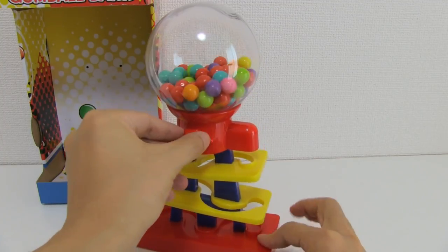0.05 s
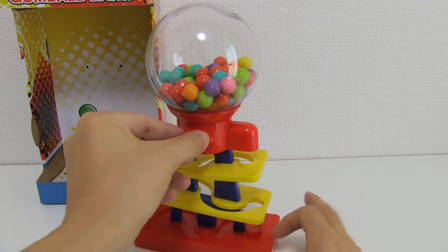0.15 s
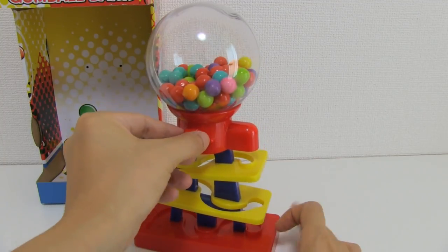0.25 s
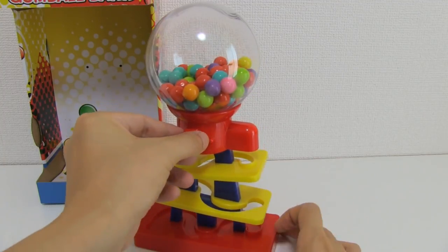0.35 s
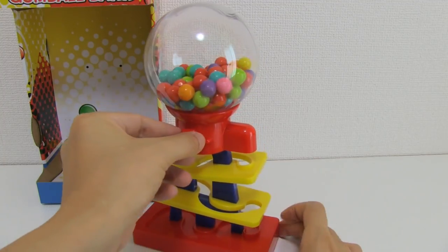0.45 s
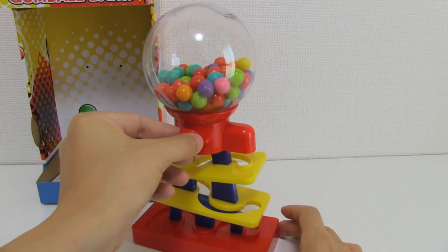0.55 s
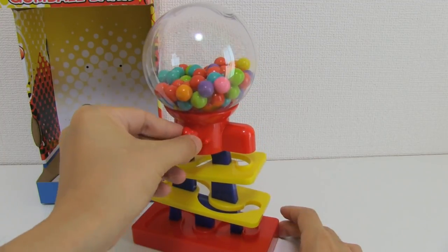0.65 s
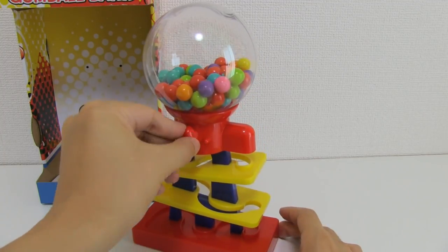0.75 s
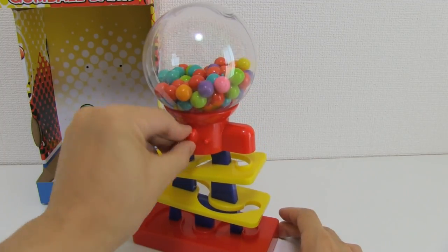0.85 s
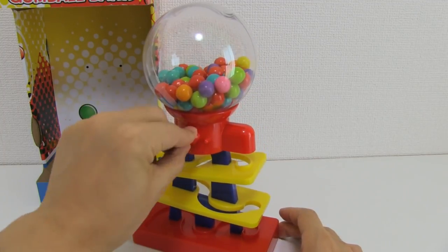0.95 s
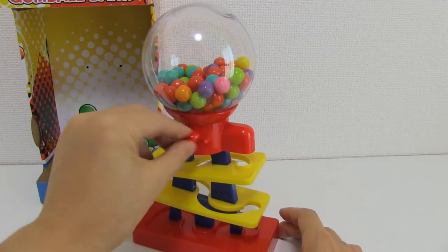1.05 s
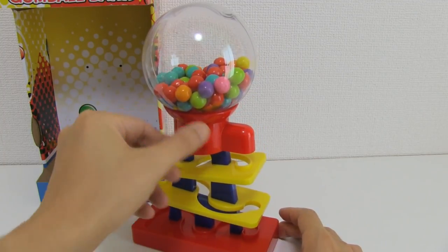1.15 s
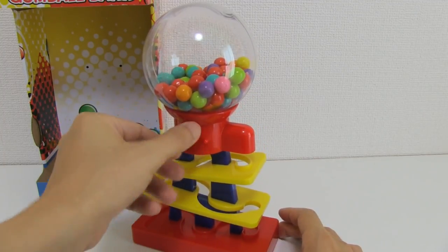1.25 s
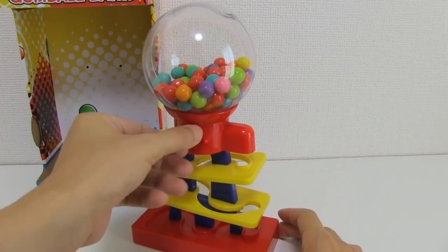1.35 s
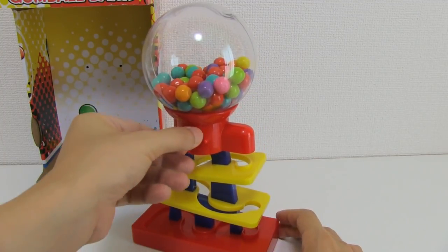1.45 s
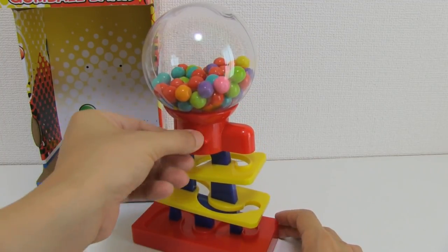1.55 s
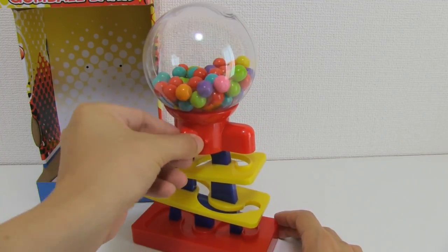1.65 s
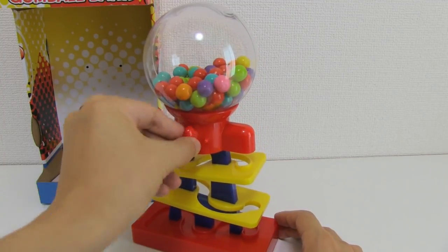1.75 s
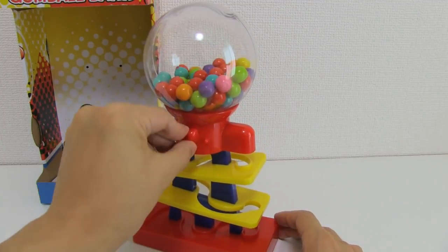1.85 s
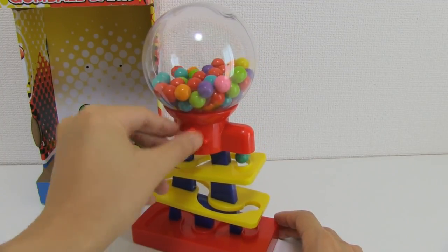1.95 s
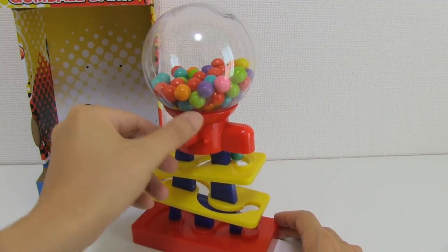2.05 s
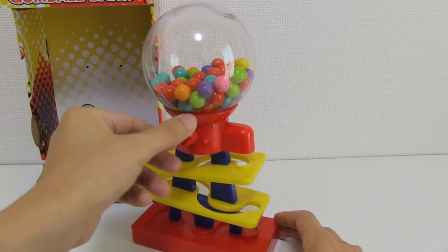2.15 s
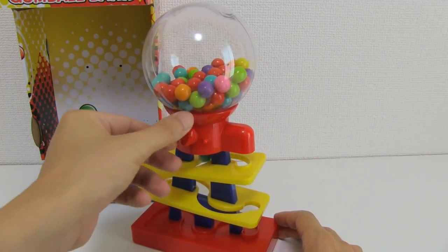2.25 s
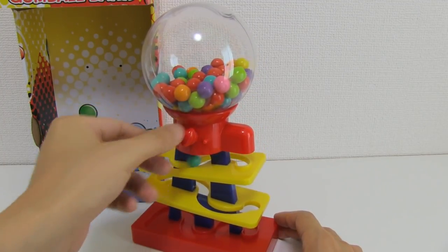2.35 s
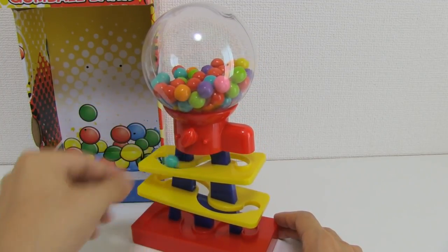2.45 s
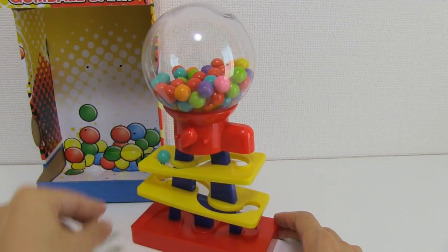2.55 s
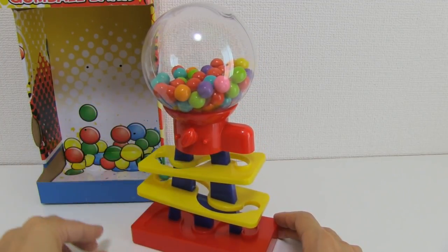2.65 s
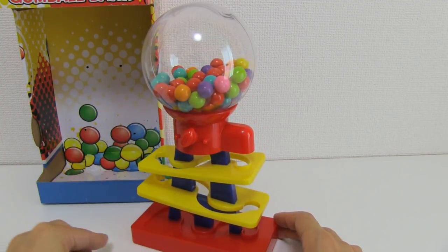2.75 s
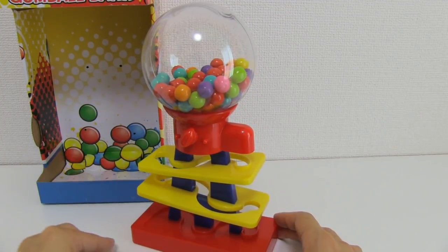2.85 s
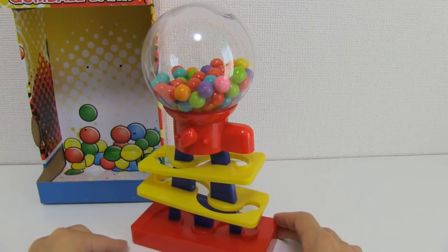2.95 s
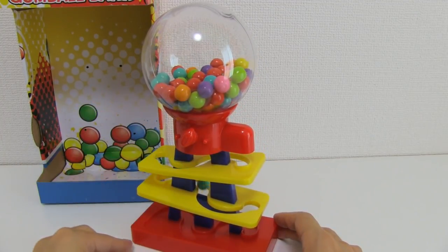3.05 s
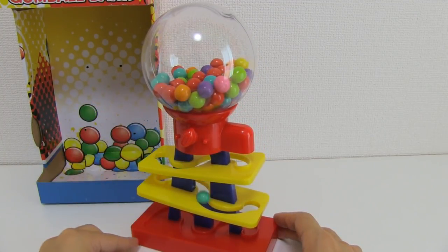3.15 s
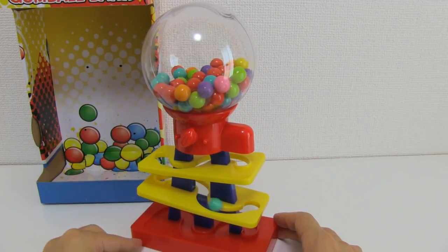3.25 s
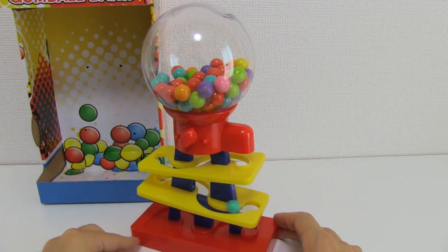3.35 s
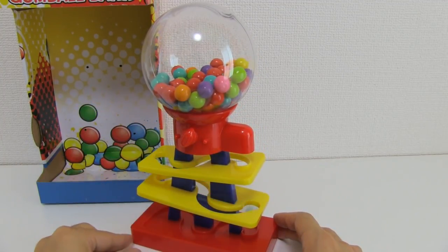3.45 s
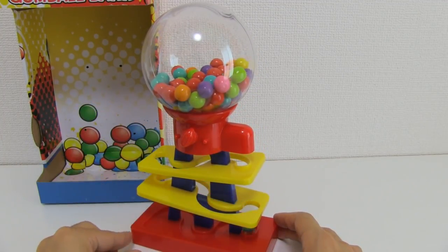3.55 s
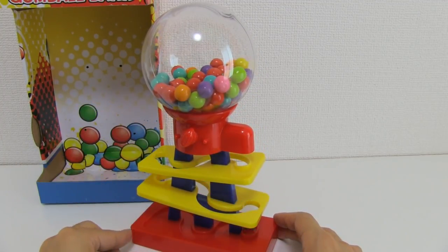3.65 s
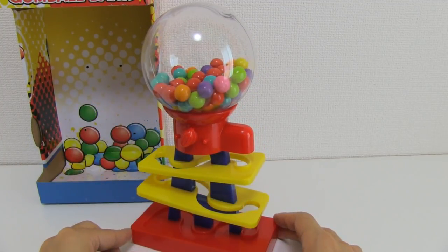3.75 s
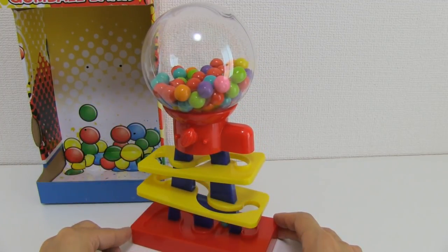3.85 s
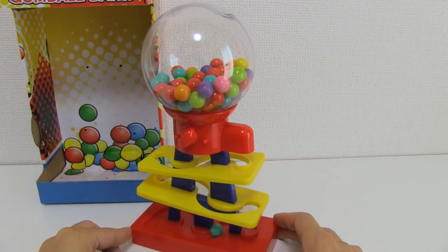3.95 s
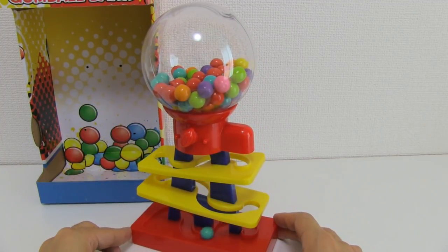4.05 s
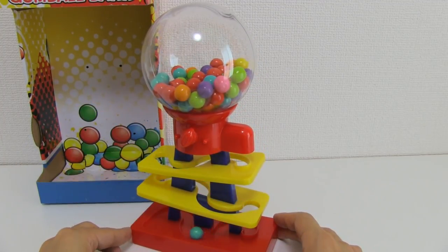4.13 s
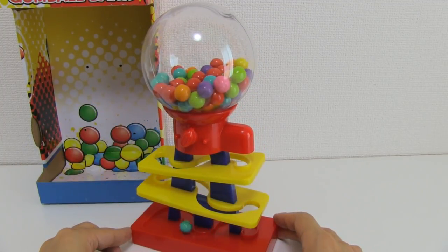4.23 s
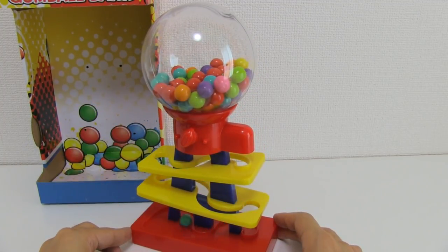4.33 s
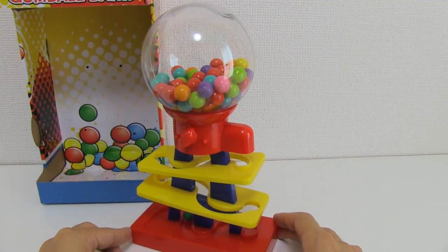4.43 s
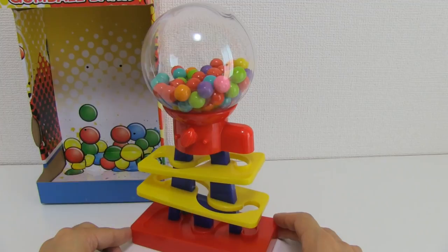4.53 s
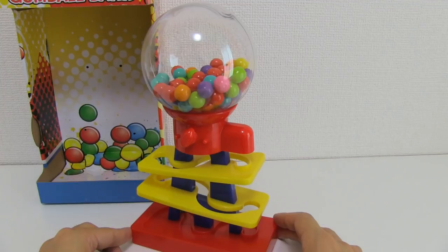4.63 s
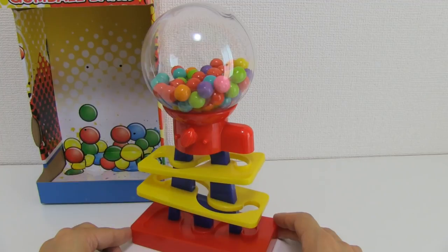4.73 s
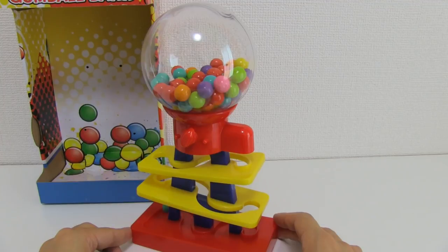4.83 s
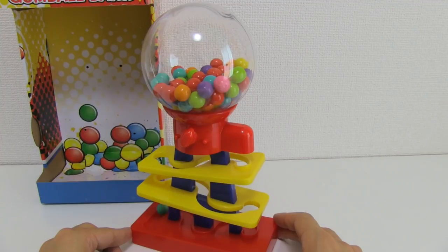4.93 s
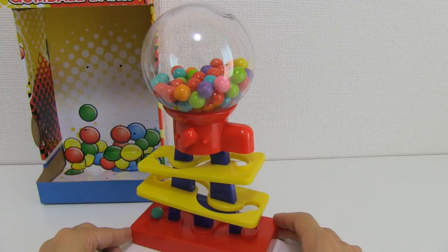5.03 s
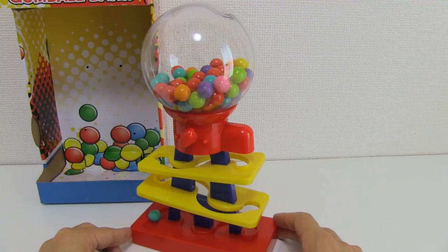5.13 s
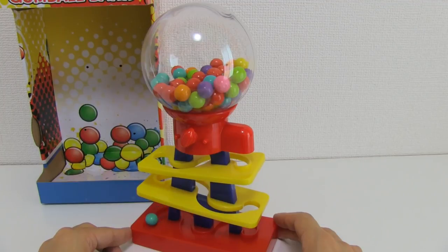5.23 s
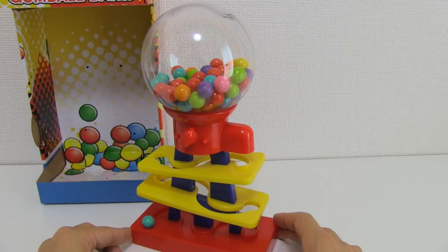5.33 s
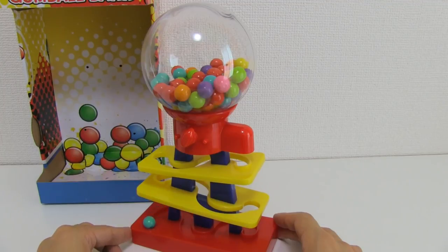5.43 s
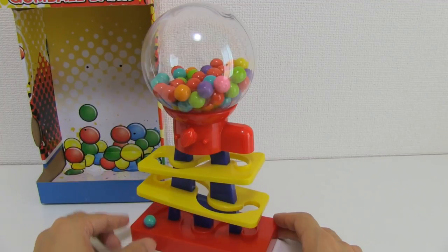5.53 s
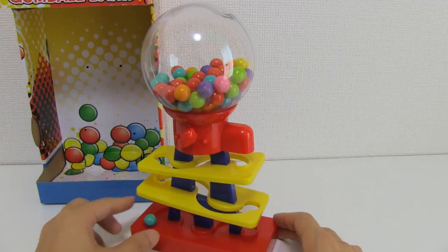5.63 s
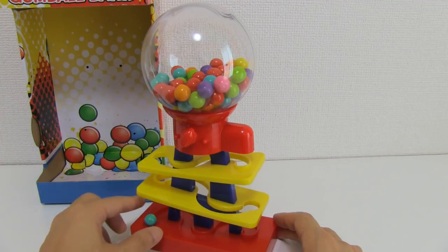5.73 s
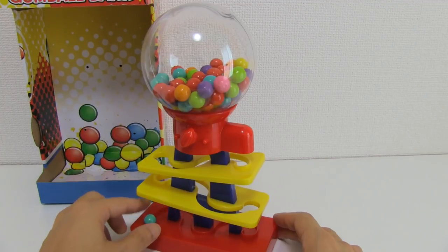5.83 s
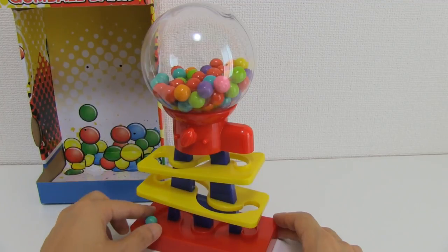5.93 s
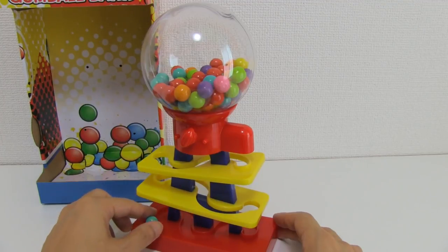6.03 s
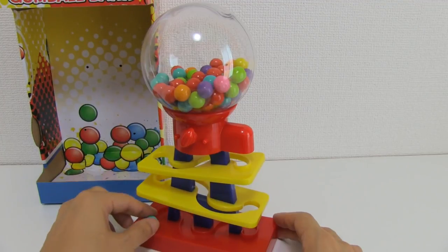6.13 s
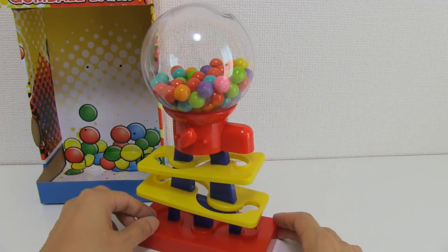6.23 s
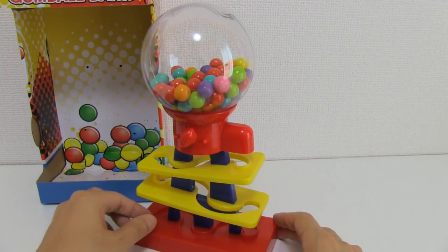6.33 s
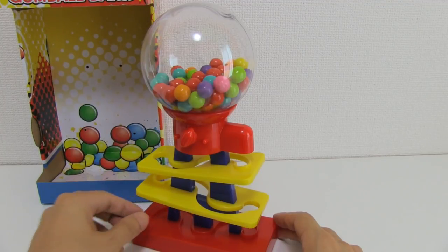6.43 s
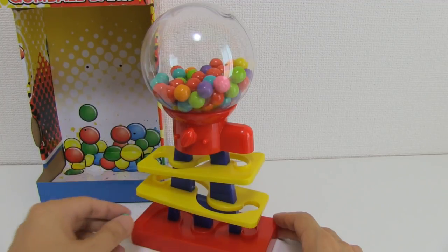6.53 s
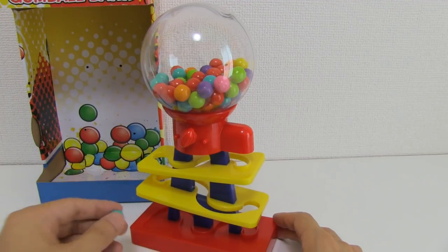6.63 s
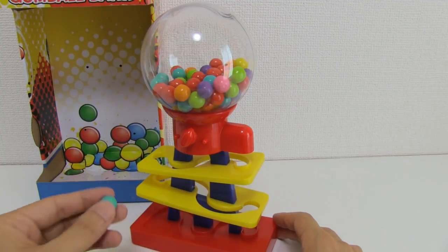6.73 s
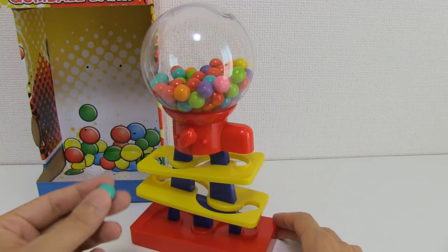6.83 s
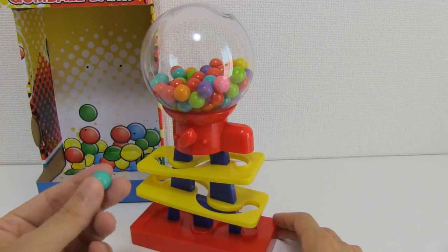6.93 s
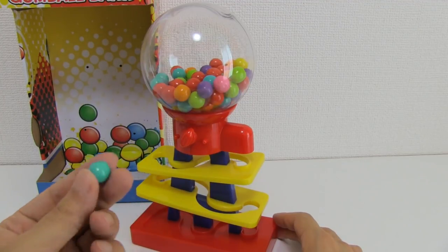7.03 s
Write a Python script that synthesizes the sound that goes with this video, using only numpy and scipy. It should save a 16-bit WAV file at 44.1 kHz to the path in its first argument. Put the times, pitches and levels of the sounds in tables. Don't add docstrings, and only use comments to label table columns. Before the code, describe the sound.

Light plastic ticks lead to irregular, hard ratchet cracks and a dense rattle of shifting balls. After a short lull, a single ball lands with a bright clack, trickles along a ramp, then drops into a hollow plastic tray with several quick bounces. Tiny rolling ticks fade, a fingertip pinch clicks, and quiet remains. Heard from a metre away in a small room with a short reverberation and faint low rumble and hiss.

```python
import sys
import numpy as np
from scipy import signal
from scipy.fft import rfft, irfft
from scipy.io import wavfile
from scipy.ndimage import uniform_filter1d

SR = 44100
rng = np.random.default_rng(int(sys.argv[2]) if len(sys.argv) > 2 else 0)


def linear_from_db(decibels):
    return 10 ** (np.asarray(decibels, float) / 20)


def dump_mix(stems):
    frames = np.atleast_2d(stems).T
    limited = np.clip(frames, -1, 1)
    pcm = np.round(limited * 32767).astype(np.int16)
    wavfile.write(sys.argv[1], SR, pcm)


N = 312562


def curve(table):
    t, level = np.transpose(table)
    return np.interp(np.arange(N) / SR, t, level)


def coloured(x, points):
    hz, db = np.transpose(points)
    f = np.maximum(np.fft.rfftfreq(x.shape[-1], 1 / SR), 1)
    gain = linear_from_db(np.interp(np.log(f), np.log(hz), db))
    return irfft(rfft(x) * gain, x.shape[-1])


def band(x, lo_hz, hi_hz, order=2):
    return signal.sosfilt(signal.butter(order, [lo_hz, hi_hz], "band", fs=SR, output="sos"), x)


def unit(x):
    return x / np.sqrt(np.mean(x ** 2))


def walk(rate):
    hold = int(SR / rate)
    steps = np.repeat(rng.standard_normal(N // hold + 1), hold)
    return 1.2 * uniform_filter1d(uniform_filter1d(steps, hold), hold)[:N]


# f/Hz, level/dB
WIDTH = [(25, 0.5), (60, -9), (700, -4), (2000, -5), (5000, -5), (12000, -2)]


def diffuse(size, side_db=0):
    mid, side = rng.standard_normal((2, size))
    side = linear_from_db(side_db) * coloured(side, WIDTH)
    return np.array([mid + side, mid - side])


def grains(rate, spread_db):
    chance = rng.random((3, N))
    strength = np.minimum(-np.log(1 - chance[2]), 2.2)
    return (chance[0] < rate / SR) * np.sign(chance[1] - .5) * linear_from_db(spread_db * strength)


def evened(x, from_hz):
    spectrum = rfft(x)
    power = np.abs(spectrum) ** 2
    broad, narrow = uniform_filter1d(power, size=600), uniform_filter1d(power, size=50)
    flat = np.sqrt(broad / (narrow + 1e-18))
    f = np.fft.rfftfreq(x.shape[-1], 1 / SR)
    return irfft(spectrum * np.where(f > from_hz, flat, 1), x.shape[-1])


# t/s, level/dB
RUMBLE = [(0.0, -43.5), (0.43, -48.5), (0.67, -55.5), (0.85, -51.5), (1.6, -57), (1.7, -49), (1.83, -59.5),
          (1.95, -50.5), (2.09, -55), (2.53, -55), (2.59, -48), (2.7, -50.5), (4.18, -59), (4.68, -55),
          (4.91, -62.5), (5.03, -54), (5.09, -57), (7.09, -56)]
# f/Hz, level/dB
RUMBLE_COLOUR = [(12, -60), (20, -18), (49, -15), (107, -1.5), (167, -6), (271, -6.5), (321, -20),
                 (361, -9.5), (450, -17.5), (580, -41.5), (990, -120)]
# t/s, level/dB
HUM = [(.7, -65), (1.0, -55), (1.6, -61.5), (2.2, -54.5), (2.6, -52), (3.3, -52.5), (3.6, -63.5),
       (4.3, -56.5), (4.8, -75.5)]
# f/Hz, level/dB
AIR = [(150, -45.5), (250, -11), (348, -14), (566, -15.5), (629, -21.5), (788, -19.5), (1180, -18),
       (2810, -27), (14700, -34), (16000, -35.5)]


def background():
    rumble = unit(coloured(diffuse(N), RUMBLE_COLOUR)) * linear_from_db(curve(RUMBLE) + 1.3 * walk(11))
    hum_hz = 148.75 * (1 + 0.0043 * walk(3.3))
    hum = np.sin(2 * np.pi * np.cumsum(hum_hz) / SR) * linear_from_db(curve(HUM) + 2.8 * walk(6.4))
    air = linear_from_db(-55.5) * unit(coloured(diffuse(N), AIR))
    return rumble + hum + air


# t/s, level/dB
HAND = [(0.06, -47), (0.26, -64), (0.51, -61), (0.93, -42), (1.14, -66), (1.3, -52), (1.75, -39.5),
        (2.21, -62.5), (2.55, -86)]
# t/s, level/dB
ROLL = [(2.0, -74), (2.4, -59.5), (3.06, -56.5), (3.5, -55), (3.69, -39), (3.99, -54.5), (4.8, -55.5),
        (5.6, -65.5), (6.3, -74)]
# peak t/s, level/dB, fade/(dB per s)
SHAKE = [
    (1.045, -32.5, 264.5),
    (1.965, -16, 222),
    (2.72, -42, 251),
    (3.63, -29.5, 229.5),
]
# t/s, length/s, level/dB
SCRAPES = [(1.351, .008, -36.5), (1.545, .01, -36), (1.646, 0.0088, -32), (1.715, 0.0041, -29),
           (1.727, 0.0093, -27), (1.863, .005, -23), (2.415, 0.012, -51), (5.99, 0.012, -41),
           (0.962, 0.006327, -26), (0.981, 0.002863, -24.5)]
# f/Hz, width/Hz, level/dB
KNOB_MODES = [(1950, 370, -5.5), (2980, 110, 0), (3400, 280, -7), (3950, 200, -2)]


def rubbing():
    t, hand = np.arange(N) / SR, curve(HAND)
    shake = 0
    for s, db, fade_db in SHAKE:
        fall_db = np.where(t < s, 259 * (s - t), fade_db * (t - s))
        shake = shake + linear_from_db(db - fall_db)
    for s, length, db in SCRAPES:
        shake = shake + linear_from_db(db) * np.exp(-((t - s) / length) ** 2)
    roll_level = linear_from_db(curve(ROLL)) + linear_from_db(hand - 3.5) + linear_from_db(-11) * shake
    skin_level = linear_from_db(-13.5 - 51 + 0.88 * (hand + 53)) + linear_from_db(-21.5) * shake

    roll = unit(band(grains(2400, 3.0), 240, 2300)) * roll_level * linear_from_db(1.5 * walk(31))

    ticks = grains(450, 3.0)
    rattle = 0
    for f, width, db in [*KNOB_MODES, (5300, 500, -10)]:
        rattle = rattle + linear_from_db(db) * signal.lfilter(*signal.iirpeak(f, f / (1.8 * width), fs=SR), ticks)
    rattle = unit(band(rattle, 1400, 11000)) * (linear_from_db(hand) + shake) * linear_from_db(2.2 * walk(33))

    skin = unit(band(grains(1300, 3.0), 4800, 18000)) * skin_level * linear_from_db(1.5 * walk(30))
    return linear_from_db(-5) * (roll + rattle + skin)


RISE_S = .00025


def pitched(ticks, hz):
    return np.insert(np.array(ticks), 2, hz, axis=1)


def knocks(events, modes, damping, chatter, contact_s, crack_s, thud_s, thud_hz, soften):
    out = np.zeros((2, N + 4096))
    t = np.arange(1024) / SR
    hz, width, db = np.transpose(modes)
    rise = 1 - np.exp(-t / RISE_S)
    click = 1. * (t == 0)
    even_thud = band(click, thud_hz, 1400, order=3)
    even_crack = band(click, 4100, 13500, order=3)
    for s, peak_db, ring_hz, thud_db, crack_db in events:
        chance = rng.standard_normal((len(hz) + 1, 3))
        noise = rng.standard_normal((3, len(t))) * rise
        lasting = linear_from_db(-soften * peak_db)

        f = np.append(hz, ring_hz) * (1 + .012 * chance[:, 0])
        gain = linear_from_db(np.append(db, 5.5) + 2.5 * chance[:, 1])
        decay = damping * np.sqrt(np.append(width, 200.) * 200) / lasting ** 1.4
        waves = np.sin(2 * np.pi * f[:, None] * t + chance[:, 2:])
        ring = (gain[:, None] * waves * np.exp(-decay[:, None] * t) * rise).sum(axis=0)
        loose = noise[2] * np.exp(-(t / (contact_s * lasting)) ** 2)
        loose = chatter * loose / np.std(loose)
        ring = band(ring / np.std(ring) + loose, .62 * min(ring_hz, 3200), 4900)

        thud = band(noise[0] * np.exp(-t / (thud_s * lasting)), thud_hz, 1700)
        crack = band(noise[1], 1800, 11000) * np.exp(-(t / (crack_s * lasting)) ** 2)
        crack = crack * (0.2 + np.exp(-t / 0.0014))

        even_ring = band(click, min(.76 * ring_hz, 2500), max(1.3 * ring_hz, 3200))
        i = int(s * SR)
        for part, smooth, part_db in ((ring, even_ring, peak_db), (thud, even_thud, thud_db + 4.5),
                                      (crack, even_crack, crack_db + 8.5)):
            part = linear_from_db(part_db) * part / np.abs(part).max()
            out[0, i:i + len(t)] += part
            out[1, i:i + len(t)] += .25 * part + .97 * np.std(part) * unit(smooth)
    return out[:, :N]


# t/s, ring level/dB, thud level/dB, crack level/dB
GRIP = [(0.0177, -37, -62, -66), (0.037, -28, -40.5, -51.5), (0.0827, -35, -47.5, -47),
        (0.1, -41, -51, -50), (0.157, -27, -39.5, -36.5), (0.19, -34.5, -37.5, -56),
        (0.3202, -47, -59, -65), (0.4688, -48, -46, -53), (0.5344, -57, -38.5, -68.5),
        (0.6115, -32, -36, -51), (2.1548, -23.5, -34.5, -38.5), (2.226, -34.5, -35, -54.5),
        (2.2364, -25, -28.5, -47), (2.2674, -20.5, -35.5, -45), (2.392, -29, -37, -56),
        (2.5022, -44, -59.5, -56), (.6424, -46, -57, -67), (.6594, -51, -50, -64),
        (2.3581, -49.5, -44.5, -67.5), (2.3711, -46, -46, -67), (2.411, -38, -35.5, -65),
        (2.428, -47, -47, -62), (2.4504, -47.5, -47.5, -66), (2.5447, -46.5, -40, -68.5),
        (2.5891, -50, -45.5, -65)]
GRIP_HZ = [1540, 2789, 1658, 1990, 2540, 2400, 1510, 2500, 1520, 1890, 2980, 1400, 1400, 2930, 2900, 2990,
           1598, 2570, 1606, 1488, 2996, 3315, 1410, 1486, 1405]
# t/s, ring level/dB, thud level/dB, crack level/dB
TWIST = [(0.6759, -39, -69, -75), (0.6987, -31, -35.5, -44.5), (0.7297, -33.5, -38.5, -48.5),
         (0.7492, -56.5, -73, -56), (0.845, -26.5, -40, -40), (0.8788, -26.5, -38.5, -43.5),
         (0.8974, -36.5, -49, -63.5), (0.9134, -36.5, -56, -57), (0.929, -18, -36, -50),
         (0.9514, -26.5, -35, -33.5), (0.9572, -24.5, -45, -41.5), (1.1824, -33, -41.5, -56),
         (1.2218, -19, -35, -47), (1.2511, -19, -46, -63), (1.511, -19.5, -52.5, -33.5),
         (1.5279, -22.5, -31.5, -41), (1.5454, -29.5, -41.5, -51), (1.5758, -30.5, -41, -44.5),
         (1.5897, -23.5, -45.5, -44), (1.6155, -21, -36, -51.5), (1.6664, -40, -44, -43),
         (1.7, -28, -43.5, -44.5), (1.7132, -27, -34.5, -35.5), (1.7444, -31, -43, -44.5),
         (1.8625, -17, -32, -29.5), (2.052, -29, -32, -37.5), (.818, -44, -59.5, -60),
         (1.0475, -19.5, -32.5, -31.5), (1.1695, -16, -27.5, -22), (1.329, -23.5, -38.5, -42),
         (1.6435, -16.5, -34.5, -43), (1.7375, -21.5, -42, -40)]
TWIST_HZ = [2914, 3640, 3950, 3670, 3680, 3414, 2905, 3004, 3400, 3860, 3950, 3300, 3500, 3080, 4046, 3972,
            4000, 3730, 3730, 2925, 3500, 2846, 2948, 3500, 3500, 3740, 2810, 3105, 3855, 3755, 3003, 3300]
# t/s, ring level/dB, ring f/Hz, thud level/dB, crack level/dB
SNAPS = [(0.9745, -18, 2932, -40, -27.5), (0.9842, -2.5, 2870, -14.5, -8.5),
         (.9875, -3.5, 2980, -24.5, -17), (1.0024, -13, 2980, -35.5, -23.5), (1.0240, 0, 2880, -32.5, -7),
         (1.0424, -10.5, 2980, -29, -27.5), (1.1637, -2, 2980, -28.5, -13.5),
         (1.1989, -10.5, 3300, -31, -28.5), (1.321, -5, 3900, -36, -36.5),
         (1.3748, -10, 3123, -24.5, -20.5), (1.3962, -14, 3690, -52.5, -38),
         (1.4513, -15, 2960, -26, -26.5), (1.4896, -14.5, 4170, -31, -32), (1.638, -23, 2970, -29.5, -41.5),
         (1.732, -19.5, 3120, -38.5, -42.5), (1.8102, -2.5, 2980, -25, -4.5),
         (1.8264, -8, 3184, -29.5, -13), (1.8334, -12, 3960, -27, -24), (1.858, -17, 3000, -41, -26.5)]
# t/s, ring level/dB, ring f/Hz, thud level/dB, crack level/dB
TUMBLE = [(1.887, -24, 4118, -21.5, -17), (1.9066, -3.5, 3042, -13.5, -8), (1.9121, -8, 4023, -13, -2),
          (1.9282, -7, 4275, -29.5, -8.5), (1.9419, -12, 3777, -21, -12.5), (1.9507, -4.5, 3740, -35, -20),
          (1.9595, 0, 2000, -21.5, -11.5), (1.9626, 0.5, 3500, -17, -12),
          (1.9708, -4.5, 2600, -20.5, -13.5), (1.9812, -11, 4140, -20.5, -16.5),
          (1.996, -14, 1660, -24.5, -27.5), (2.002, -17, 3860, -27.5, -27.5),
          (2.0165, -20.5, 4140, -40, -27), (2.0287, -25.5, 3646, -33.5, -27)]


def knob_and_globe():
    events = [*SNAPS, *TUMBLE, *pitched(GRIP, GRIP_HZ), *pitched(TWIST, TWIST_HZ)]
    return knocks(events, KNOB_MODES, damping=2.7, chatter=1.0, contact_s=0.0041, crack_s=0.0068,
                  thud_s=0.002, thud_hz=546.4, soften=0.047)


def table(x):
    hz, t60_s = 282, .2
    pole = np.exp(2j * np.pi * hz / SR - np.log(1000) / (t60_s * SR))
    return linear_from_db(-6.5) * signal.lfilter([.05], [1, -pole], band(x, 180, 1400)).real


# f/Hz, t60/s, level/dB
ROOM = [(298, 0.16, -5.5), (550.7, 0.53, -17), (880, 0.23, -11), (2000, 0.33, -21), (4000, 0.3, -19.5),
        (7100, 0.29, -18.5), (10300, 0.25, -30.5), (14000, 0.076, -38)]
# f/Hz, level/dB
ROOM_DIP = [(490, 0.5), (630, -6), (790, -0.5)]


def room(direct, around):
    t = np.arange(SR // 2) / SR
    hz, t60, db = np.transpose(ROOM)
    tail = 0
    for f in 250 * 2 ** np.arange(0, 6.1, .5):
        decay_s = np.interp(np.log(f), np.log(hz), t60)
        level_db = np.interp(np.log(f), np.log(hz), db)
        side_db = -5 * np.clip(np.log2(f / 2000), 0, 3)
        noise = band(diffuse(len(t), side_db), f / 2 ** (1 / 4), min(f * 2 ** (1 / 4), 20000))
        tail = tail + linear_from_db(level_db) * noise * np.exp(-np.log(1000) * t / decay_s)
    tail = evened(tail, 2500) * np.clip(t / 0.0019, 0, 1) * linear_from_db(-17.0)

    early = np.zeros(1024)
    early[[0, int(.0016 * SR), int(.019 * SR)]] = 1, .25, .04
    pan = linear_from_db(1.2 * np.array([[.5], [-.5]]))
    near = pan * signal.fftconvolve(direct, early)[:N]
    return near + signal.fftconvolve(coloured(around, ROOM_DIP)[None], tail, axes=1)[:, :N]


# t/s, length/s, f/Hz, level/dB
BRUSH = [
    (0.485, 0.027, 5734, -58),
    (5.534, 0.025, 7850, -57.5),
    (5.952, 0.01735, 12280, -49),
    (6.491, 0.044, 10040, -62),
]


def fingertips():
    t = np.arange(N) / SR
    noise = rng.standard_normal(N)
    out = np.zeros(N)
    for s, length, hz, db in BRUSH:
        hiss = unit(band(noise, hz / 1.4, min(hz * 1.2484, 16500)))
        out += linear_from_db(db) * np.exp(-((t - s) / length) ** 2) * hiss
    return out


# t/s, f/Hz, t60/s, level/dB
RINGS = [(.9845, 2980, .07, -15.5), (.9845, 6420, .015, -12.5), (1.0245, 2970, .06, -19.5),
         (1.0245, 1420, 0.019, -11.5), (1.0245, 1840, .025, -14), (1.0475, 1500, .02, -24),
         (1.164, 1500, .015, -14), (1.164, 2100, .015, -17.5), (1.3214, 3580, 0.017, -21),
         (1.375, 274.5, 0.44, -43.5), (1.375, 960, 0.023, -23.5), (1.8105, 1680, .015, -11),
         (1.8105, 1910, .03, -15.5), (1.9065, 3100, .03, -15), (1.964, 3650, 0.018, -10),
         (1.971, 3000, 0.016, -11.5), (2.0165, 1019, .02, -21), (2.029, 3860, .025, -19),
         (2.69, 2950, 0.11, -24.5), (2.69, 5430, .02, -14), (2.69, 765, 0.033, -27.5),
         (3.497, 3150, 0.026, -19.5), (3.497, 397, 0.03, -31), (3.54, 3490, 0.026, -4.5),
         (3.54, 2120, .05, -10), (3.54, 282, 0.47, -42), (3.602, 4380, .02, -18.5), (3.602, 3500, .03, -18),
         (3.624, 3500, .03, -22), (3.998, 3406, .015, -27), (4.05, 3569, 0.019, -39),
         (4.069, 3700, 0.0217, -33), (4.119, 2330, 0.03296, -34), (4.125, 742, 0.044, -36.5),
         (4.38, 767, .08, -43.5), (4.451, 760, 0.072, -40.5), (5.639, 765, 0.11, -38),
         (5.639, 2690, 0.0463, -38), (5.999, 2746, 0.2, -41), (5.999, 2320, 0.051, -21.5),
         (5.999, 2060, 0.068, -29.5), (5.999, 752, 0.059, -31.5)]


def rings():
    out = np.zeros(N)
    t = np.arange(SR // 3) / SR
    flutter = unit(walk(160))
    for s, hz, t60, db in RINGS:
        i = int(s * SR)
        wobble = .7 * flutter[::-1][i:i + len(t)]
        wave = np.sin(2 * np.pi * hz * t + wobble) * (1 - np.exp(-t / RISE_S))
        out[i:i + len(t)] += linear_from_db(db - 60 * t / t60) * wave
    return out * linear_from_db(4.5 * np.clip(flutter, -2, 1))


# f/Hz, width/Hz, level/dB
RAMP_MODES = [(2190, 160, 4), (2580, 63, -6.5), (2980, 56, 8.5), (3824, 90, -6), (4140, 57, -12.5)]
# t/s, ring level/dB, ring f/Hz, thud level/dB, crack level/dB
RAMP_DROP = [
    (2.6572, -13.5, 2257, -34.5, -24),
    (2.6597, -7, 2150, -37, -27),
    (2.6894, 1.5, 2300, -28, -3.5),
    (2.6958, -7.5, 3130, -22, -36),
]
# t/s, ring level/dB, thud level/dB, crack level/dB
RAMP = [(2.884, -23, -39.5, -56), (2.9273, -32, -44.5, -62.5), (2.958, -24.5, -33.5, -64),
        (2.9819, -35.5, -43, -63), (3.0678, -28.5, -38.5, -72), (3.1, -49, -39, -67),
        (3.2918, -35.5, -47, -63), (3.3068, -26, -38, -46), (3.3736, -41.5, -41, -57),
        (3.3995, -50, -42.5, -61), (3.4334, -44.5, -44, -49.5), (2.9076, -50, -41, -66),
        (3.1376, -53, -52, -65.5), (3.2762, -46, -43, -66), (3.3496, -49, -44.5, -67),
        (3.4214, -47.5, -39, -66)]
RAMP_HZ = [2670, 2542, 2930, 2500, 2550, 1500, 1400, 1985.4, 3680, 1430, 1708, 1430, 1400, 1464, 1914, 1400]


def ramps():
    return knocks([*RAMP_DROP, *pitched(RAMP, RAMP_HZ)], RAMP_MODES, damping=4.1, chatter=2.4,
                  contact_s=0.00056, crack_s=0.0031, thud_s=0.0048, thud_hz=465, soften=0.04)


# f/Hz, width/Hz, level/dB
TRAY_MODES = [(1466, 86, -12), (2130, 44, 1), (2720, 46, -2), (3500, 77, -3), (4000, 170, -24)]
# t/s, ring level/dB, ring f/Hz, thud level/dB, crack level/dB
TRAY_DROP = [(3.4963, -10.5, 3146, -23.5, -18.5), (3.4995, -13, 2900, -37, -23), (3.5395, 3, 2100, -22, -4),
             (3.6025, -1.5, 1900, -21.5, -14), (3.6235, -7.5, 2130, -22, -29),
             (3.559, -18.5, 1690, -24.5, -40), (3.6908, -17.5, 1890, -28, -52),
             (3.6995, -21, 2960, -39, -48), (5.383, -20.5, 1420, -31, -38.5),
             (5.6385, -21, 2730, -27.5, -36), (5.6445, -21, 2074, -32, -59.5),
             (5.9978, -16.5, 2410, -49, -25.5), (6.0015, -9, 2810, -26, -56), (6.0155, -34, 2720, -61, -53),
             (6.036, -35.5, 2730, -63, -55)]
# t/s, ring level/dB, thud level/dB, crack level/dB
SETTLE = [(3.7485, -26, -32, -50), (3.799, -25.5, -41.5, -56), (3.82, -30, -33.5, -45),
          (3.838, -29, -38, -61), (3.901, -45, -44, -62), (3.9366, -40, -38, -59),
          (3.9979, -23, -37.5, -44), (4.0137, -36, -41.5, -62), (4.0324, -47, -61, -62),
          (4.049, -27, -41, -65), (4.068, -27, -35, -58), (4.0872, -36, -45, -50),
          (4.1187, -22.5, -35, -47), (4.1274, -37, -33, -52.5), (4.1896, -42, -43.5, -72.5),
          (4.2494, -43, -43, -67), (4.284, -33.5, -40.5, -71), (4.2994, -50, -40, -65),
          (4.32, -31, -39, -63), (4.3274, -30, -42, -57), (4.38, -31, -39.5, -47), (4.3954, -34, -41, -51),
          (4.4506, -32, -42, -48), (4.4574, -34, -48, -53.5), (4.054, -27.5, -50, -47),
          (4.139, -47, -46, -63.5), (4.37, -46, -40, -64)]
SETTLE_HZ = [2650, 2100, 2206, 1950, 1860, 1500, 2690, 2000, 2000, 1950, 2628, 2100, 2100, 1500, 2110, 2770,
             2080, 2100, 4200, 2640, 1680, 2500, 2617, 2100, 3670, 2000, 1720]
# t/s, ring level/dB, thud level/dB, crack level/dB
TRAY = [(4.5808, -27, -36.5, -64), (4.5874, -30.5, -33, -47), (4.6551, -26, -35.5, -53),
        (4.6685, -22, -35, -50), (4.6774, -24, -32, -46), (4.8118, -25.5, -35, -68),
        (4.9175, -32.5, -39, -68.5), (5.0184, -52, -42.5, -70.5), (5.0253, -37.5, -46, -74.5),
        (5.165, -24.5, -34, -52), (5.1892, -30.5, -33.5, -58), (5.1954, -37, -46.5, -67),
        (5.274, -39, -36.5, -66.5), (5.4533, -52, -42, -67.5), (5.9507, -34.5, -38, -58),
        (6.224, -47.5, -42, -75), (4.7817, -52, -46.5, -62), (4.8745, -47, -44.5, -70),
        (4.9777, -53, -48.5, -71)]
TRAY_HZ = [1430, 2100, 2650, 2685.2, 2640, 1477.2, 1400, 1740, 2100, 2100, 2170, 2100, 2110, 1500, 2397.4,
           2228.6, 1740, 1410, 1740]


def tray():
    events = [*TRAY_DROP, *pitched(SETTLE, SETTLE_HZ), *pitched(TRAY, TRAY_HZ)]
    return knocks(events, TRAY_MODES, damping=3.9, chatter=0.83, contact_s=0.0036, crack_s=0.0031,
                  thud_s=0.0031, thud_hz=569, soften=0.1)


def scene():
    toy = knob_and_globe() + ramps() + tray()
    direct, around = toy + rubbing() + fingertips() + rings()
    return room(direct, around) + table(toy[1]) + background()


def band_limit(x):
    return signal.sosfilt(signal.butter(12, 16990, fs=SR, output="sos"), x)


def record(dry):
    rounded = np.tanh(0.6 * dry) / 0.71
    response = [(20, -6.0), (45, 7.0), (11000, -5), (14500, -4.0), (15700, -5.5), (16200, -35.5)]  # f/Hz, level/dB
    mix = coloured(rounded, response)
    return band_limit(mix)


dry = scene()
out = record(dry)
dump_mix(out)
```